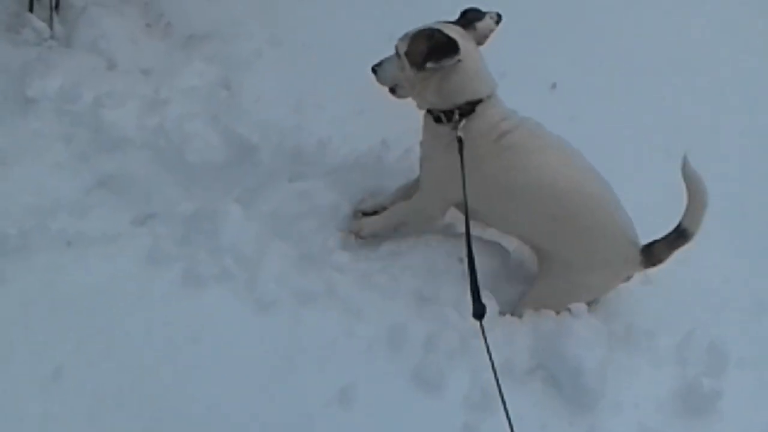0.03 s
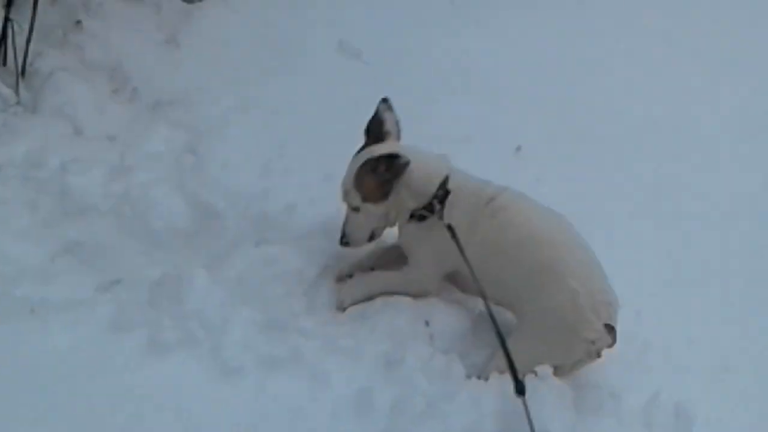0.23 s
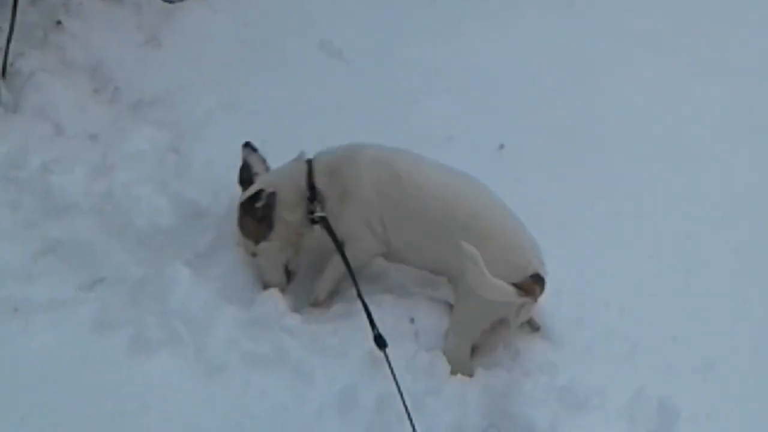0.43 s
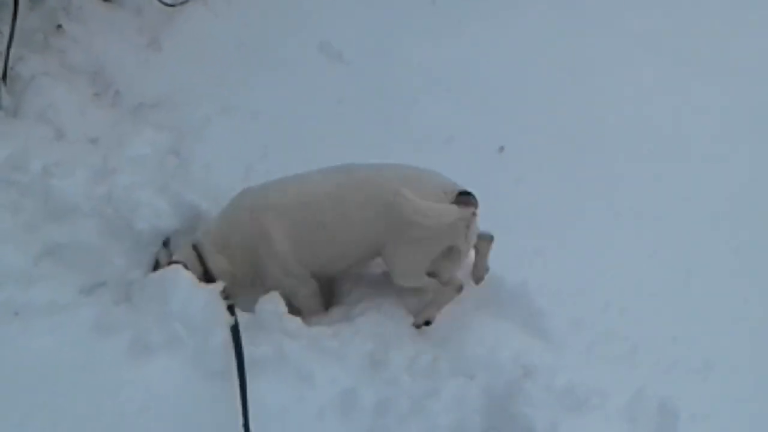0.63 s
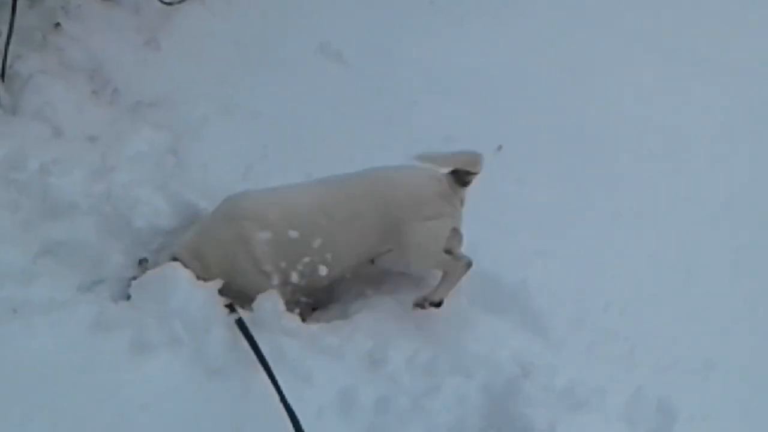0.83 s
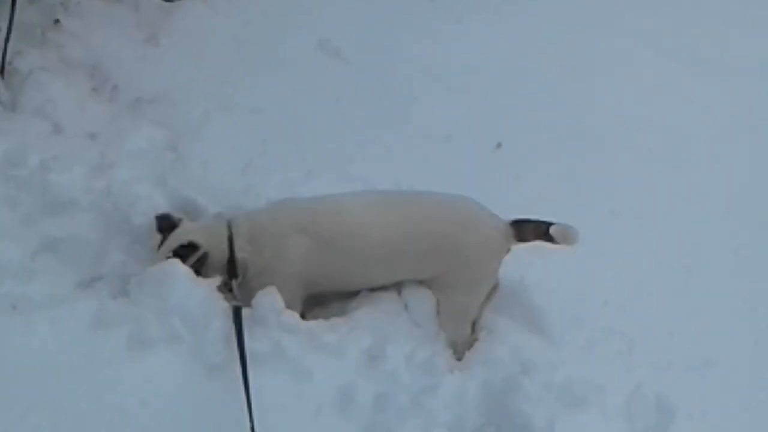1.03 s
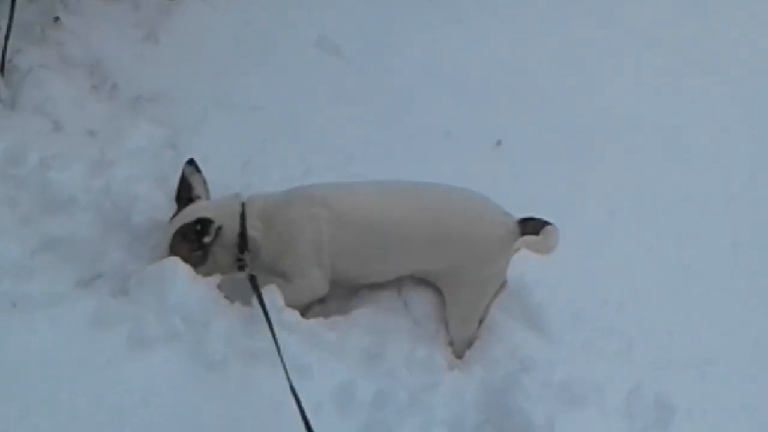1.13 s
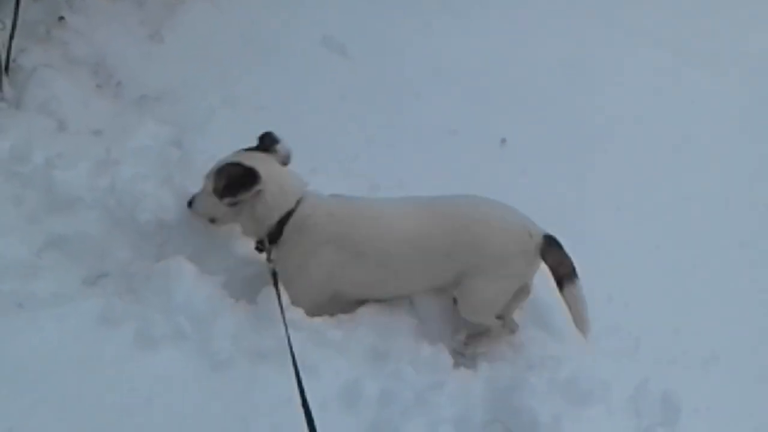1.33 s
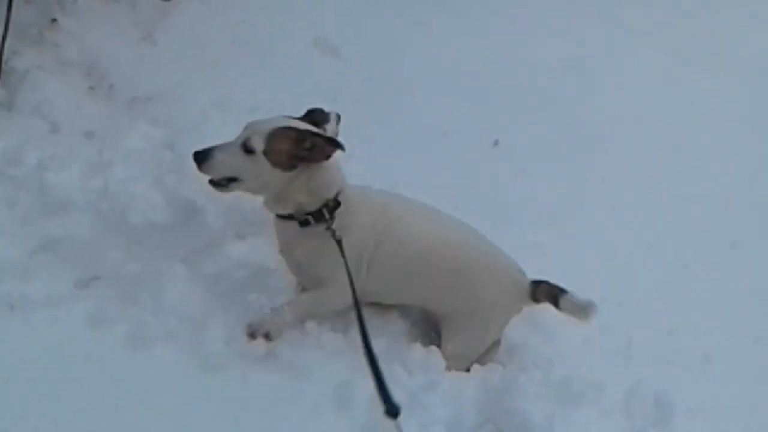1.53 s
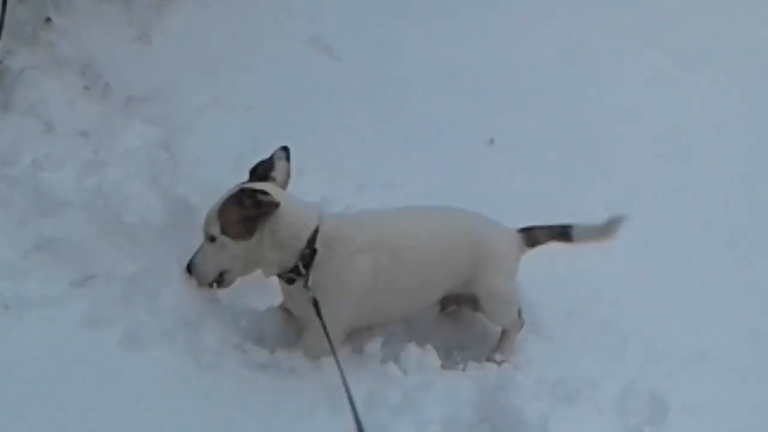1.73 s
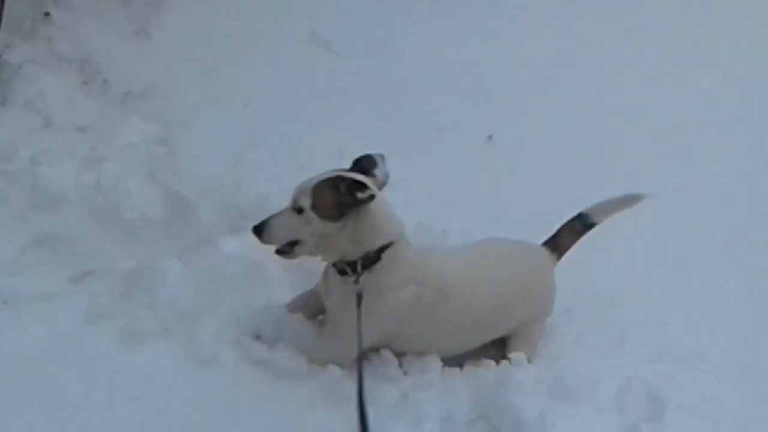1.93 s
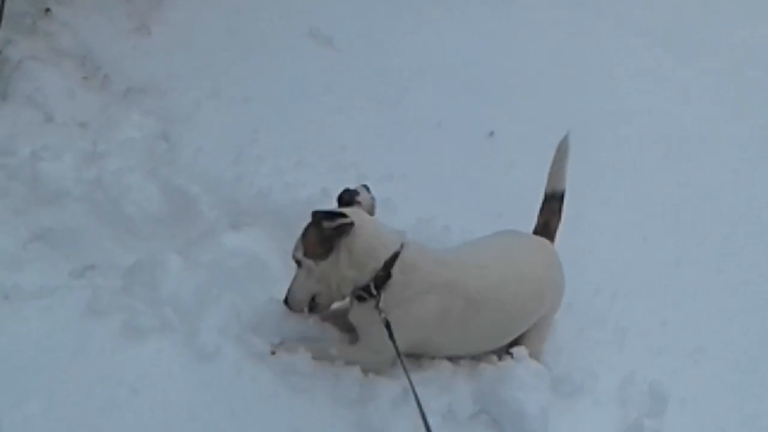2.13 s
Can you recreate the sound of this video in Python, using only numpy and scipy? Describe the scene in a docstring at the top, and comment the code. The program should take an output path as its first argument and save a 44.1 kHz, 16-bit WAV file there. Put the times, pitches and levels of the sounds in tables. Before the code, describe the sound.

Snow rustles and swishes softly for about two seconds as a small dog digs outdoors. Dull, irregular thumps and a low wind rumble on the microphone start near 0.2 seconds, peak around 1 second, then ease. Brief snow squeaks come at 0.2, 1.15 and 1.7 seconds, with small crunches between 1.2 and 1.7. Two very faint high chirps sound near 1.4 and 1.8 seconds over a quiet hiss.

```python
"""In deep snow in the open air, a small dog pounces, digs, pushes its snout in and jumps back.
Friction between grains makes the snow rustle, swish and squeak; packed snow collapses in crunches.
Dull thumps, pressure pulses from plunging paws or wind on the microphone, ride on a low gusty rumble.
Behind them lie two faint high chirps, a steady hiss and a camera's thin whine. The sound is almost mono."""
import sys
import numpy as np
from scipy.fft import rfft, irfft, next_fast_len
from scipy.io import wavfile
from scipy.ndimage import uniform_filter1d, map_coordinates

SR = 44100
rng = np.random.default_rng(int(sys.argv[2]) if len(sys.argv) > 2 else 0)


def output_pcm(signal):
    """Save a mono or channel-first signal as 16-bit PCM at the path in sys.argv[1].

    Samples are clipped to [-1, 1] before scaling.
    """
    pcm = np.clip(np.atleast_2d(signal).T, -1, 1) * 32767
    wavfile.write(sys.argv[1], SR, np.round(pcm).astype(np.int16))


N = 97020  # 2.2 s
TIME = np.arange(N) / SR


# Envelopes of the rustle: (time [s], relative body level [dB], relative fizz level [dB])
RUSTLE_LEVELS = [(0.0, -72, -84), (0.06, -74.5, -81.5), (0.4, -63.5, -73.5), (0.49, -70.5, -79),
                 (0.67, -63.5, -73), (0.87, -65, -73), (1.14, -62.5, -70.5), (1.33, -67, -75),
                 (1.45, -67.5, -72.5), (1.6, -67.5, -76), (1.67, -64, -70.5), (1.75, -67.5, -75),
                 (1.82, -64, -73), (1.86, -72, -76.5), (1.94, -68, -76), (1.97, -72, -77), (2.07, -69, -75),
                 (2.14, -84.5, -79)]
# Spectrum of the rustle's body: (frequency [Hz], relative level [dB])
BODY_SPECTRUM = [(250, -29), (500, 1), (800, -0.5), (1200, 0), (2000, 1), (3000, 1), (3900, 5.5),
                 (4700, -2.5), (5600, -12.5), (7000, -14), (10000, -22), (16000, -30)]
# Spectrum of its fine fizz: (frequency [Hz], relative level [dB])
FIZZ_SPECTRUM = [(2000, -21), (4500, 11.5), (6500, 2), (9000, 2.5), (12000, 2), (16000, 1.5)]
# Shoves of paws and snout: (time [s], half-width [s], level [dB], centre [Hz], bandwidth [octaves])
SWISHES = [(0.154, 0.0058, -64.5, 1210, 0.8), (0.228, 0.043, -65, 3560, 0.46),
           (0.286, 0.013, -62.5, 3770, 0.27), (0.623, 0.085, -67, 4300, 0.17),
           (.652, 0.021, -62.5, 1780, 0.27), (0.681, 0.018, -63, 715, 0.22), (0.69, .04, -51.5, 312, 0.27),
           (0.775, 0.067, -55.5, 226, 0.41), (0.805, 0.018, -64.5, 4370, 0.5),
           (0.827, 0.01, -42.5, 275, 0.27), (1.006, 0.064, -60.5, 3750, 0.4),
           (1.51, 0.026, -65.5, 4300, 0.29), (1.683, 0.053, -62, 4700, 0.28),
           (1.773, 0.061, -63, 3680, 0.28), (1.817, 0.028, -64.5, 3460, 0.052),
           (1.805, 0.045, -69, 1880, 0.13), (1.93, 0.025, -66, 3850, 0.39), (2.177, 0.04, -61, 3200, 0.27),
           (2.187, 0.043, -67, 1650, .5)]
# Collapses of packed snow: (time [s], level [dB])
CRUNCHES = [(1.184, -59), (1.371, -54), (1.399, -57), (1.464, -59), (1.683, -61)]

def snow():
    """Granular friction: loose snow rustles and swishes as it slides; packed snow yields abruptly."""
    body_gain_db, fizz_gain_db, flicker_db = 2.5, 3.5, 1
    crunch_rise_s, crunch_decay_s = 0.0025, 0.016
    body_db, fizz_db = envelopes(RUSTLE_LEVELS)
    body = amp(body_db + body_gain_db) * coloured_noise(BODY_SPECTRUM)
    fizz = amp(fizz_db + fizz_gain_db) * coloured_noise(FIZZ_SPECTRUM)
    for time, half_width, db, centre_hz, octaves in SWISHES:
        body += amp(db) * gaussian(TIME - time, half_width) * band_noise(centre_hz, octaves)
    for time, db in CRUNCHES:
        age = TIME - time
        envelope = np.clip(age / crunch_rise_s, 0, 1) * np.exp(-np.abs(age) / crunch_decay_s)
        body += amp(db) * envelope * band_noise(centre_hz=4060, octaves=0.24)
    grain = unit_rms(amp(flicker_db * wobble(knots_per_s=300)))
    return body * grain + fizz


# Squeaks of the snow: (time [s], half-width [s], level [dB], centre [Hz])
SQUEAKS = [(0.225, 0.016, -62, 5300), (1.151, 0.0092, -53, 4200), (1.63, 0.039, -76, 6040),
           (1.712, 0.043, -61.5, 5360)]

def squeaks():
    """Random frequency modulation roughens falling tones, perhaps snow rubbing under the paws."""
    sag_hz_per_s, roughness_hz = 3800, 322
    out = np.zeros(N)
    for time, half_width, db, centre_hz in SQUEAKS:
        age = TIME - time
        hz = centre_hz - sag_hz_per_s * age + roughness_hz * wobble(knots_per_s=1300)
        out += amp(db) * gaussian(age, half_width) * tone(hz)
    return out


# Pushes of air: (time [s], level [dB], pitch [Hz], relative crest level [dB], decay length [cycles])
THUMPS = [(0.187, -43, 120, -10, 0.96), (.225, -34, 180, -27, 0.86), (0.245, -41, 190, -26, 1.35),
          (0.309, -38.5, 134, -26, 0.72), (.339, -39, 142, -5.5, 1.9), (0.377, -31.5, 159, -13, 0.7),
          (0.392, -39, 127, -25, 1.1), (0.419, -41, 133, -36, 0.92), (0.631, -29.5, 217, -21, .9),
          (0.680, -36.5, 124, -6, 0.92), (0.793, -37, 152, -22, 1.16), (0.818, -35.5, 183, -12, 2.4),
          (0.937, -30.5, 178, -36, 1.1), (.953, -26, 208, -17.5, 1), (1.05, -37.5, 165, -30, 1.2),
          (1.106, -32, 189, -23, 2.5), (1.137, -34.5, 122, -37, 0.51), (1.162, -28, 190, -12.5, 0.51),
          (1.188, -34.5, 200, -16, 0.55), (1.261, -42, 191, -19, 0.93), (1.370, -34.5, 174, -9.5, .55),
          (1.430, -39, 101, -10, 0.68), (1.454, -40, 128, -8, 0.97), (1.470, -33.5, 147, -16, 0.54),
          (1.518, -41, 193, -12, 1.4), (1.575, -44, 147, -33, 2.1), (1.667, -40, 237, -26, 0.64),
          (1.679, -41.5, 130, -21, 1.25), (1.707, -41.5, 206, -28, 0.82), (1.826, -44.5, 156, -7, 1.34),
          (1.946, -46, 192, -34, 1.7), (2.026, -47, 96, -13, 1), (2.049, -49.5, 161, -21, 1),
          (2.074, -46, 105, -23, 0.69)]

def thumps():
    """Damped oscillation: each pressure pulse swells fast, sags in pitch and carries a sharper crest."""
    rise_share, glide, low_cut_hz = 0.4, 0.17, 26
    crest_pitch_ratio, crest_cycles = 1.68, 0.32
    out = np.zeros(N)
    for time, db, hz, crest_db, decay_cycles in THUMPS:
        cycles = (TIME - time) * hz
        width = decay_cycles * np.where(cycles < 0, rise_share, 1)
        swell = np.exp(1 - np.sqrt(1 + (1.76 * cycles / width) ** 2))
        phase_lag = glide * (np.sqrt(1 + cycles ** 2) - 1)
        push = swell * np.cos(2 * np.pi * (cycles - phase_lag))
        crest = np.exp(-(cycles / crest_cycles) ** 2) * np.sin(2 * np.pi * crest_pitch_ratio * cycles)
        out += amp(db) * (push - amp(crest_db) * crest)
    return filtered(out, lambda hz: hz ** 4 / (hz ** 4 + low_cut_hz ** 4))


# Gusts on the microphone: (time [s], level [dB])
GUSTS = [(0, -82.5), (.12, -70), (.19, -58.5), (.25, -53.5), (.28, -59), (.33, -56), (.42, -52.5),
         (.49, -68), (.56, -54), (.60, -55), (.67, -45), (.74, -56.5), (.81, -45.5), (.87, -53.5),
         (.95, -41), (1.02, -51), (1.11, -43.5), (1.18, -46.5), (1.23, -52.5), (1.28, -49), (1.32, -62.5),
         (1.44, -52), (1.55, -60.5), (1.69, -48), (1.76, -59), (1.82, -53), (1.88, -63.5), (1.93, -50.5),
         (1.98, -73.5), (2.03, -63), (2.08, -54.5), (2.12, -77), (2.2, -66)]
# Spectrum of the wind: (frequency [Hz], relative level [dB])
RUMBLE_SPECTRUM = [(15, -54), (30, -29.5), (55, -2), (95, 5.5), (185, -1.5), (260, -7), (350, -13.5),
                   (500, -27.5), (900, -35.5), (2000, -85)]

def wind():
    """Turbulence: pressure fluctuations at the microphone make a low rumble in short gusts."""
    level_db, = envelopes(GUSTS)
    air = coloured_noise(RUMBLE_SPECTRUM)
    # Dividing by the running rms evens out the noise, so the gusts set its level.
    running_rms = np.sqrt(np.abs(uniform_filter1d(air[0] ** 2, size=900)) + 0.00069)
    return amp(level_db) * air / running_rms


# Faint high chirps: (time [s], level [dB])
CHIRPS = [(1.422, -79), (1.844, -76.5)]

def chirps():
    """Quadratic frequency sweep: each tone falls and levels off, perhaps a distant bird."""
    length_s, start_hz, end_hz, jitter_hz = 0.061, 8300, 6720, 50
    out = np.zeros(N)
    for time, db in CHIRPS:
        progress = np.clip((TIME - time) / length_s, 0, 1)
        sweep_hz = end_hz + (start_hz - end_hz) * (1 - progress) ** 2
        envelope = np.sqrt(np.abs(np.sin(np.pi * progress)))
        out += amp(db) * envelope * tone(sweep_hz + jitter_hz * wobble(knots_per_s=900))
    return out


# Spectrum of the steady hiss: (frequency [Hz], relative level [dB])
HISS_SPECTRUM = [(60, -1.5), (200, -15), (500, -10.5), (1000, -16.5), (2400, -16), (3800, -10.5),
                 (5200, -21.5), (7500, -32.5), (15500, -33)]
# Faint low-mid noise, independent in left and right: (frequency [Hz], relative level [dB])
WIDE_NOISE_SPECTRUM = [(30, -13), (120, -17), (350, -3), (600, 5.5), (1200, -4), (2500, -36), (6000, -36)]

def background():
    """Stationary noise floor: the camera's whine and a hiss, slightly widened by uncorrelated noise."""
    hiss = amp(-69) * coloured_noise(HISS_SPECTRUM)
    whine = amp(-91.5) * np.sin(2 * np.pi * 7441 * TIME)
    wide_noise = filtered(rng.standard_normal((2, N)), lambda hz: amp(log_interp(WIDE_NOISE_SPECTRUM, hz)))
    return hiss + whine + amp(-88) * unit_rms(wide_noise)


# Likeness of left and right: (frequency [Hz], correlation [ratio])
STEREO_CORRELATION = [(5900, 1), (8000, .48), (12000, 0.44)]

def stereo_noise(response):
    """Mid-side mixing: noise of rms 1, shaped by a response, mono below and wider in the treble."""
    def mid_side_response(hz):
        angle = np.arccos(log_interp(STEREO_CORRELATION, hz)) / 2
        return response(hz) * np.array([np.cos(angle), np.sin(angle)])
    mid, side = filtered(rng.standard_normal((2, N)), mid_side_response)
    return unit_rms(np.array([mid + side, mid - side]))


def coloured_noise(spectrum):
    """Spectral shaping: stereo noise that follows (frequency [Hz], relative level [dB]) points."""
    return stereo_noise(lambda hz: amp(log_interp(spectrum, hz)))


def band_noise(centre_hz, octaves):
    """Resonance: stereo noise gathered around one frequency."""
    return stereo_noise(lambda hz: (1 + (np.log2((hz + 1) / centre_hz) / octaves) ** 2 / 2) ** -1.5)


def filtered(x, response):
    """Linear filtering: the spectrum of x times a frequency response."""
    size = next_fast_len(N + SR // 2)
    return irfft(rfft(x, size) * response(np.fft.rfftfreq(size, 1 / SR)), size)[..., :N]


def tone(hz):
    """A sine whose phase is the integral of its frequency."""
    return np.sin(2 * np.pi * np.cumsum(hz) / SR)


def gaussian(age, half_width):
    """A bell-shaped envelope, 17 dB down at one half-width from its peak."""
    return np.exp(-2 * (age / half_width) ** 2)


def wobble(knots_per_s):
    """A smooth curve through random knots."""
    return map_coordinates(rng.standard_normal(N // 8), [TIME * knots_per_s], mode="mirror")


def envelopes(rows):
    """Linear interpolation to every sample of each column after the time."""
    times, *columns = np.transpose(rows)
    return [np.interp(TIME, times, column) for column in columns]


def log_interp(points, hz):
    """Interpolation of (frequency [Hz], value) points on a logarithmic axis."""
    frequencies, values = np.transpose(points)
    return np.interp(np.log(hz + 1), np.log(frequencies + 1), values)


def amp(db):
    """Decibels to amplitude ratio."""
    return 10 ** (np.asarray(db) / 20)


def unit_rms(x):
    """Normalisation to rms 1."""
    return x / np.sqrt(np.mean(x ** 2) + 1e-20)


def scene():
    """Superposition in a free field: the sources add, with no echo over the snow."""
    return snow() + squeaks() + thumps() + wind() + chirps() + background()


def record(dry):
    """Band limiting: the camera passes nothing above 15.8 kHz."""
    return filtered(dry, lambda hz: hz < 15800)


dry = scene()
out = record(dry)
output_pcm(out)
```